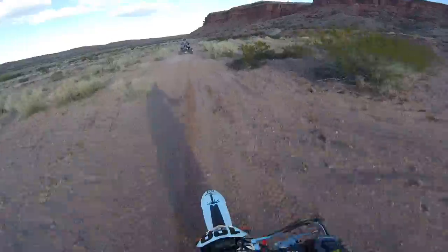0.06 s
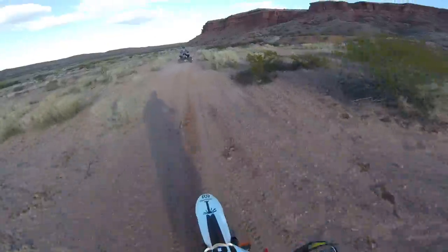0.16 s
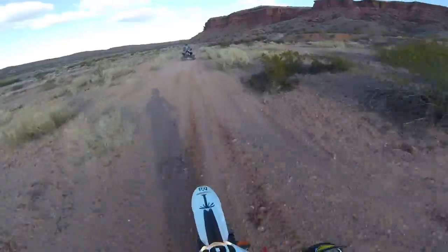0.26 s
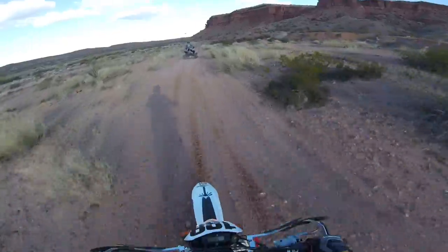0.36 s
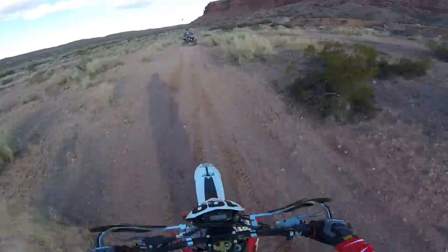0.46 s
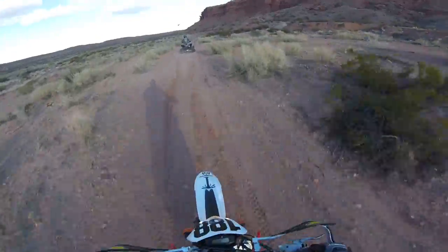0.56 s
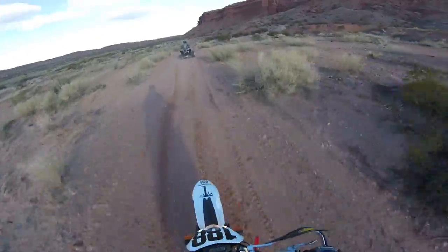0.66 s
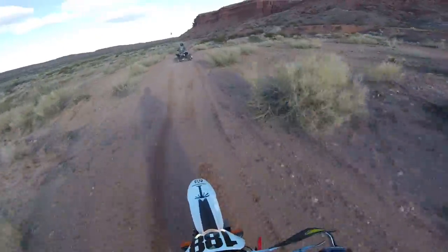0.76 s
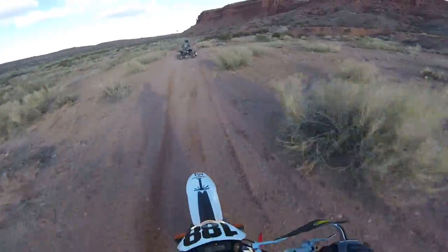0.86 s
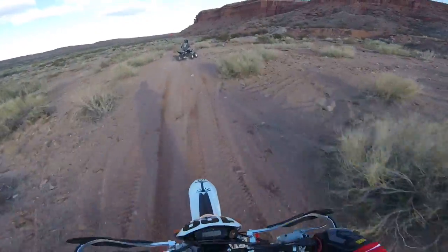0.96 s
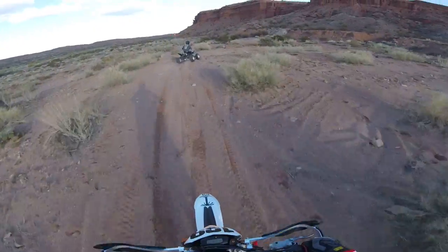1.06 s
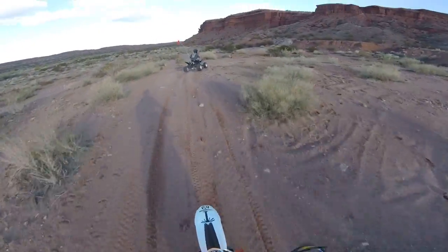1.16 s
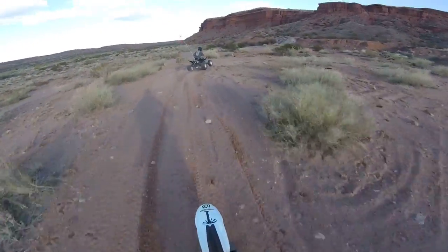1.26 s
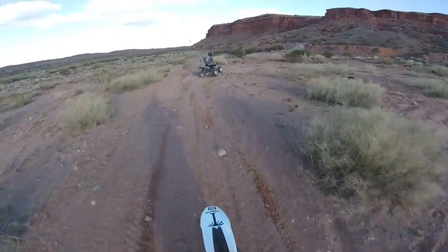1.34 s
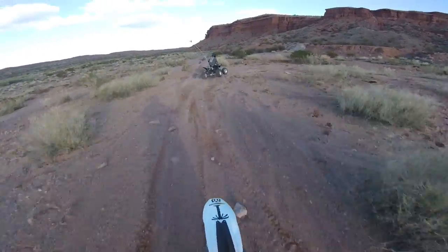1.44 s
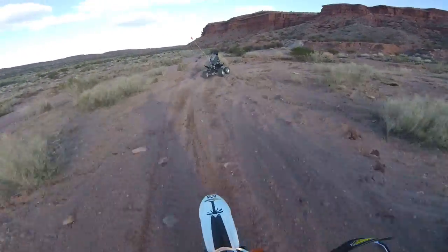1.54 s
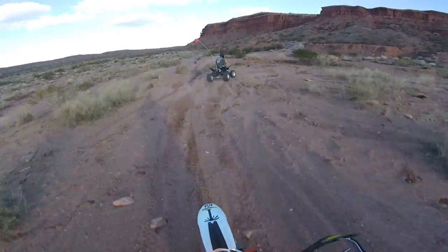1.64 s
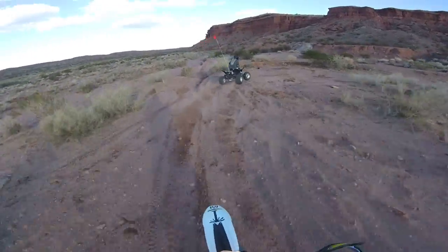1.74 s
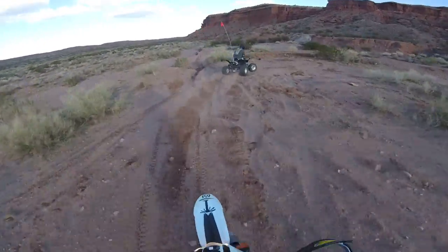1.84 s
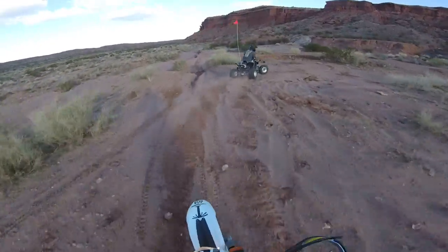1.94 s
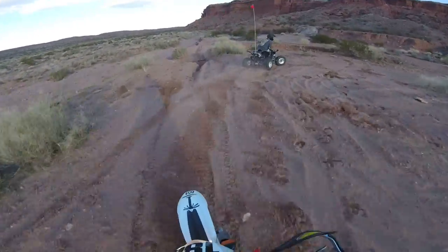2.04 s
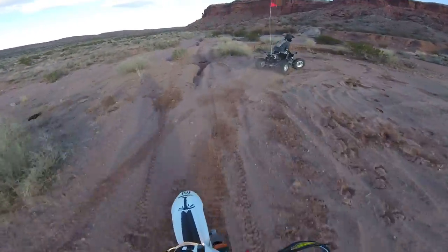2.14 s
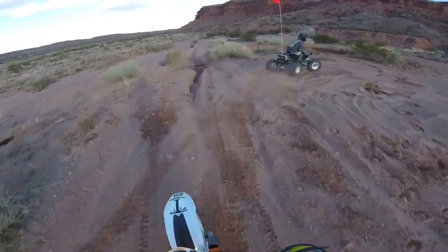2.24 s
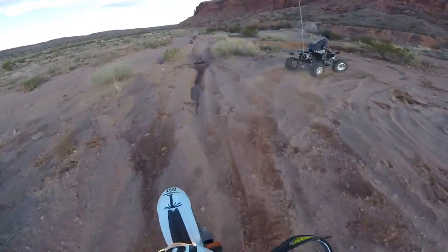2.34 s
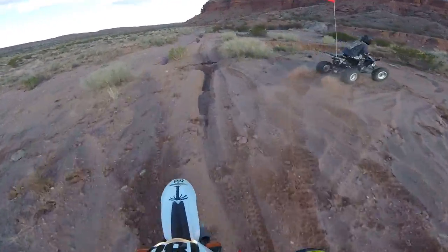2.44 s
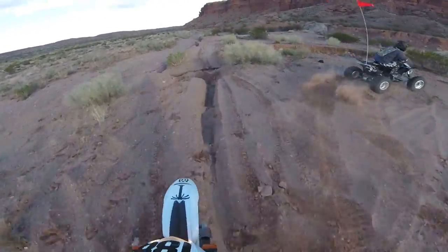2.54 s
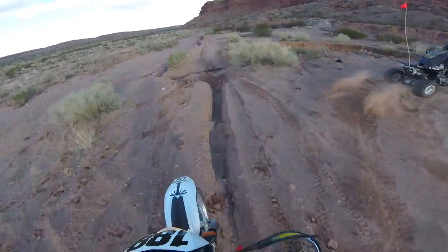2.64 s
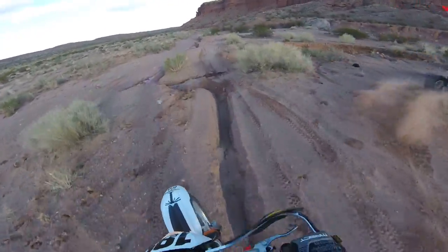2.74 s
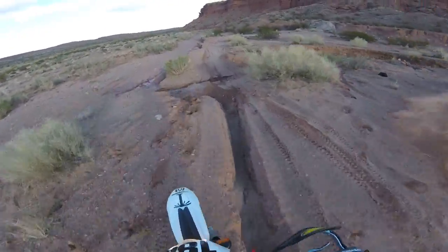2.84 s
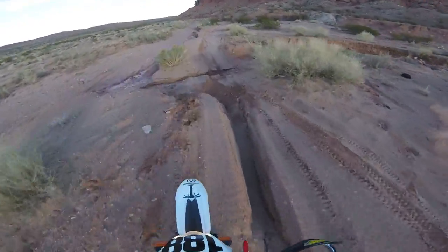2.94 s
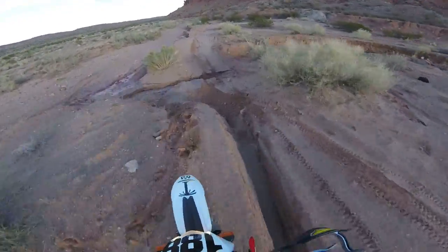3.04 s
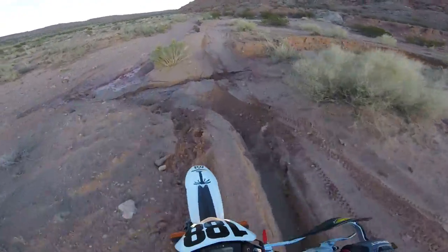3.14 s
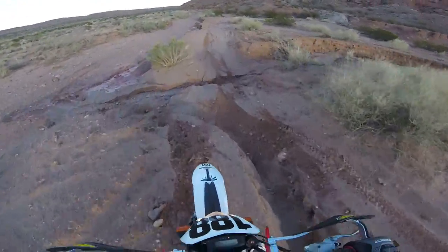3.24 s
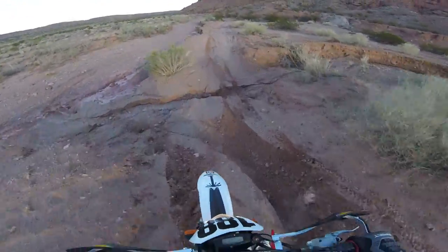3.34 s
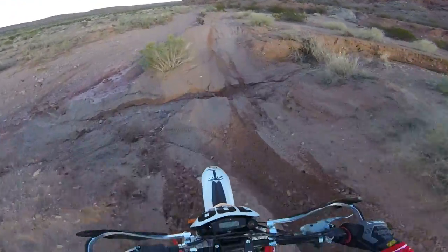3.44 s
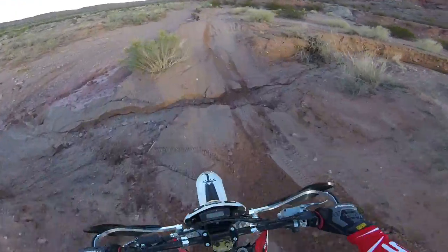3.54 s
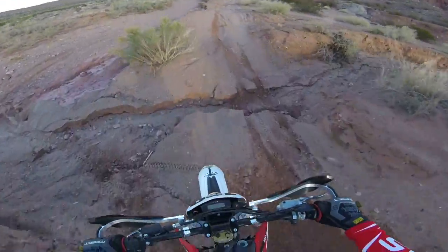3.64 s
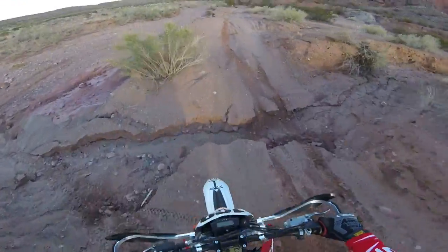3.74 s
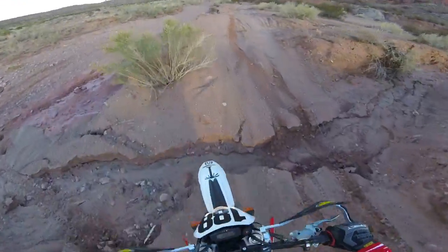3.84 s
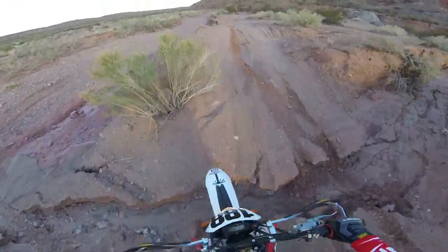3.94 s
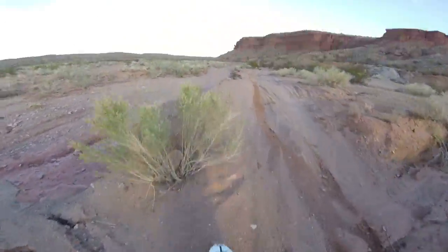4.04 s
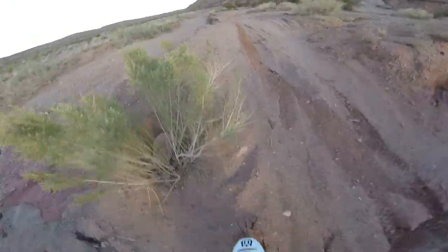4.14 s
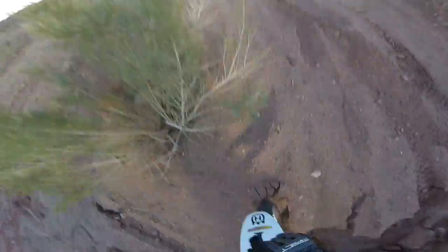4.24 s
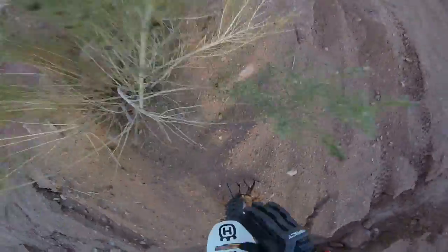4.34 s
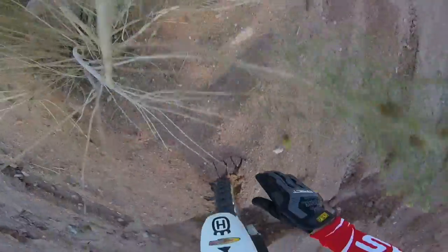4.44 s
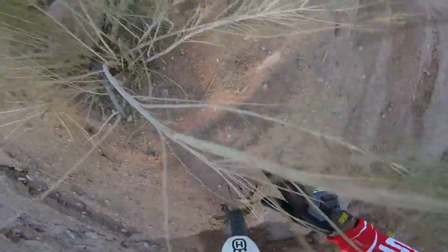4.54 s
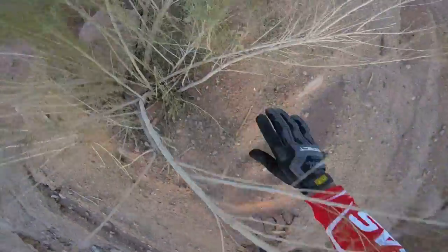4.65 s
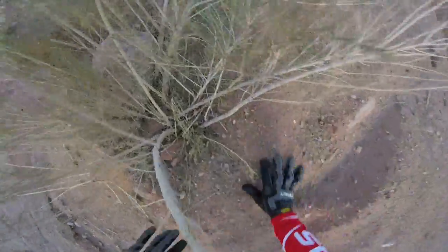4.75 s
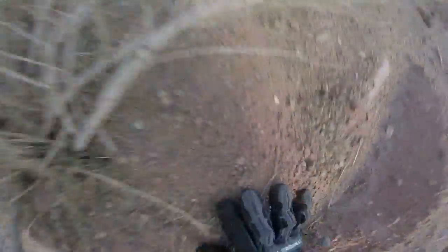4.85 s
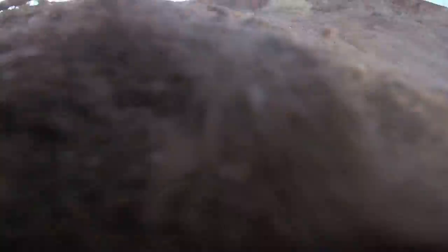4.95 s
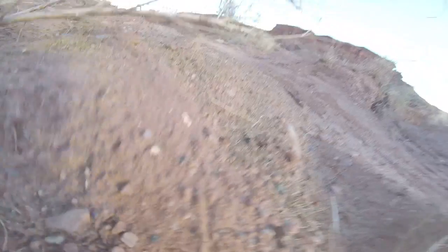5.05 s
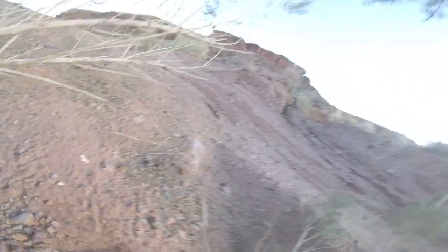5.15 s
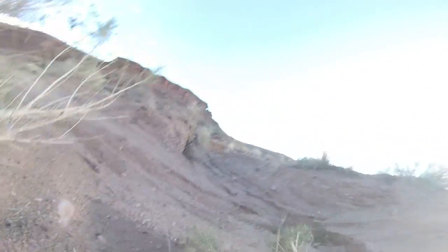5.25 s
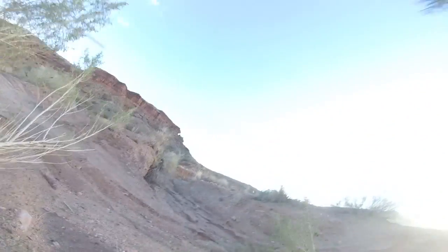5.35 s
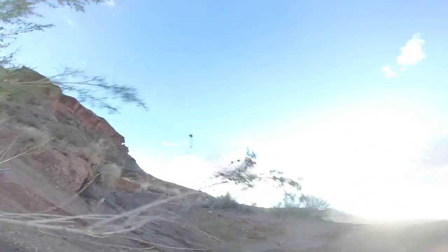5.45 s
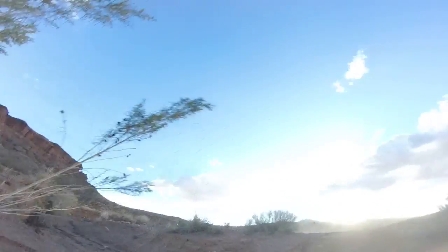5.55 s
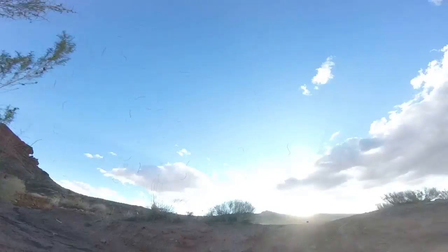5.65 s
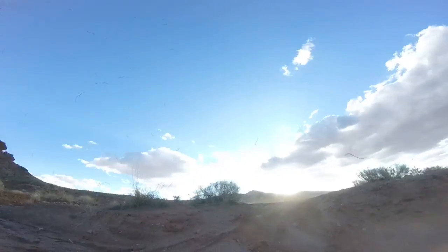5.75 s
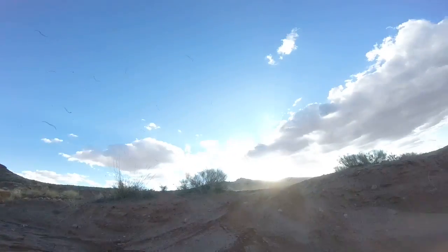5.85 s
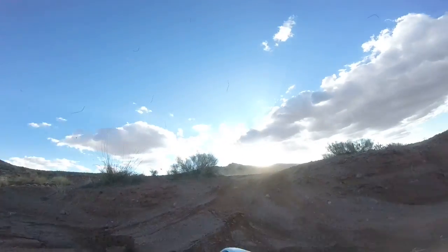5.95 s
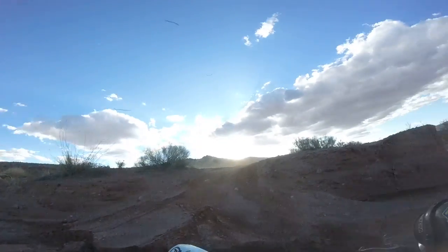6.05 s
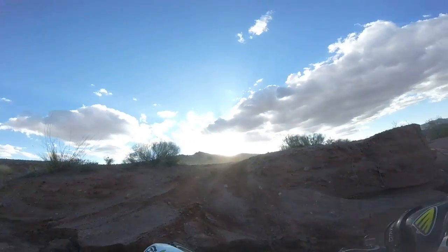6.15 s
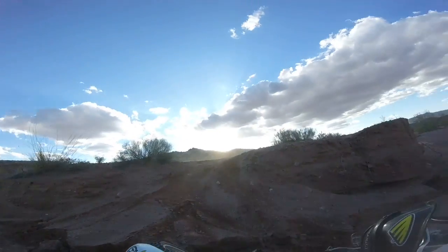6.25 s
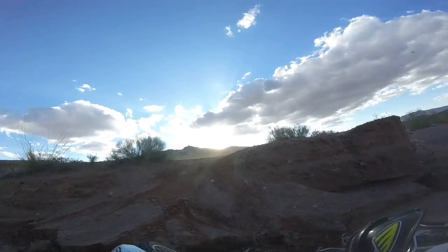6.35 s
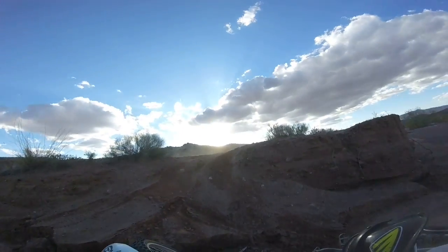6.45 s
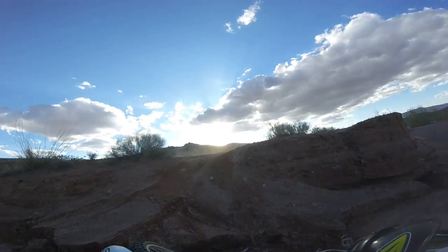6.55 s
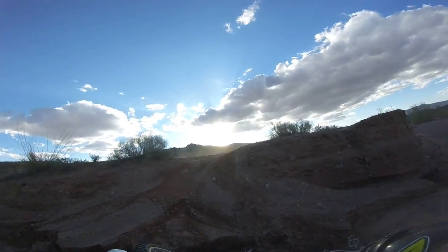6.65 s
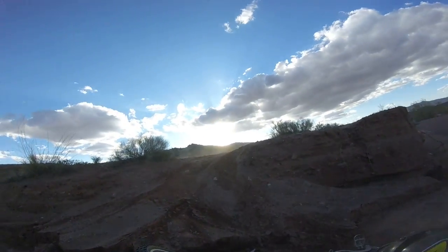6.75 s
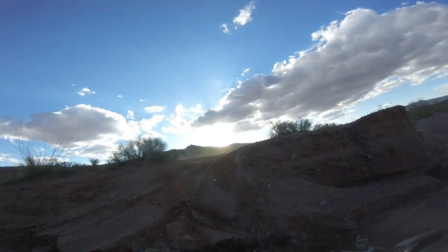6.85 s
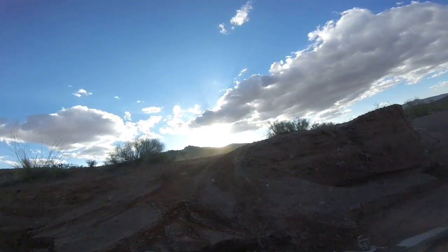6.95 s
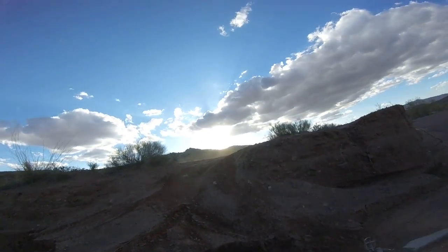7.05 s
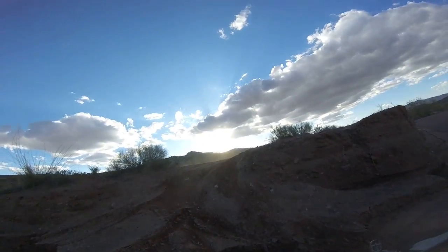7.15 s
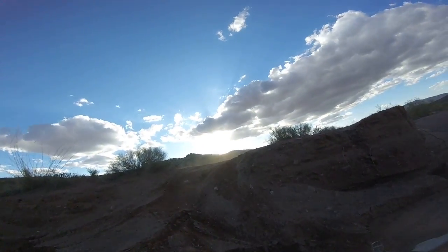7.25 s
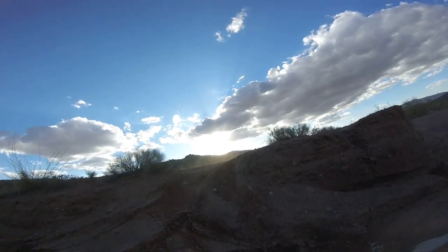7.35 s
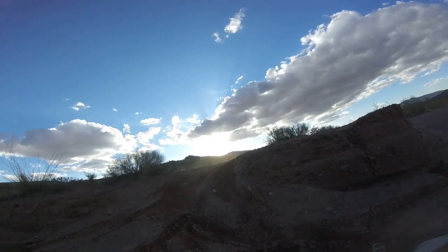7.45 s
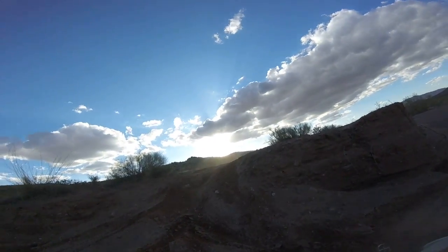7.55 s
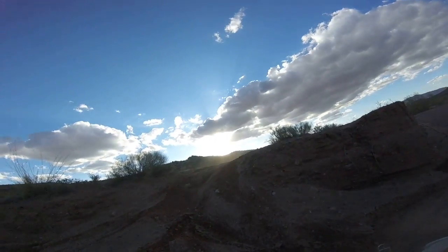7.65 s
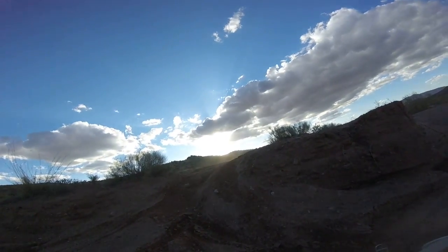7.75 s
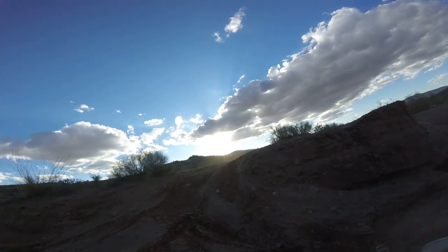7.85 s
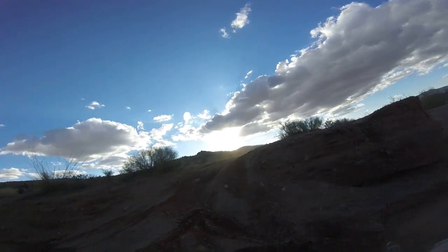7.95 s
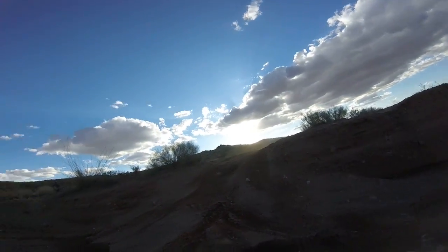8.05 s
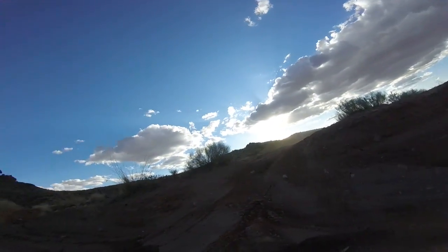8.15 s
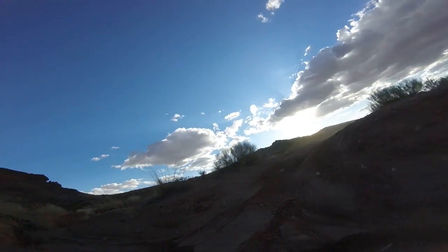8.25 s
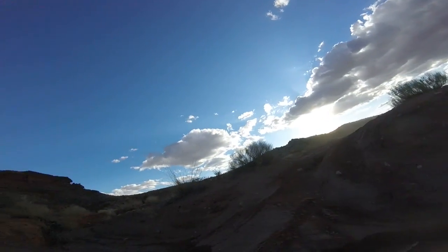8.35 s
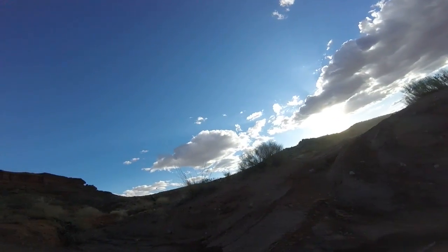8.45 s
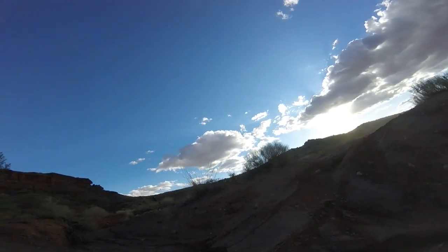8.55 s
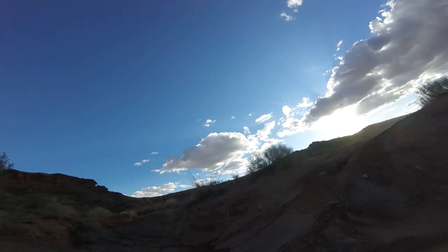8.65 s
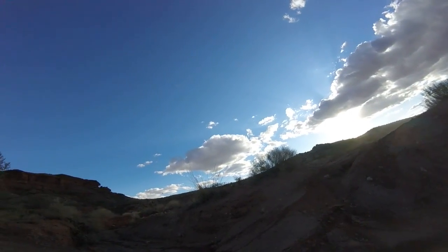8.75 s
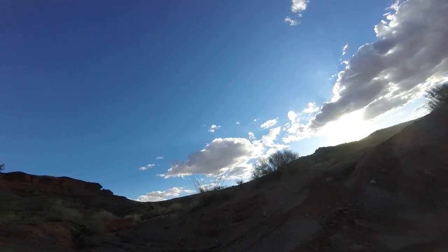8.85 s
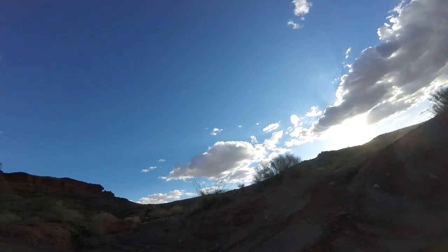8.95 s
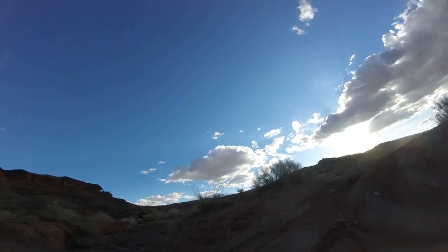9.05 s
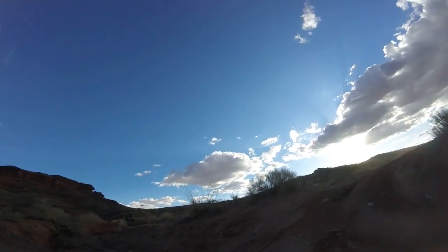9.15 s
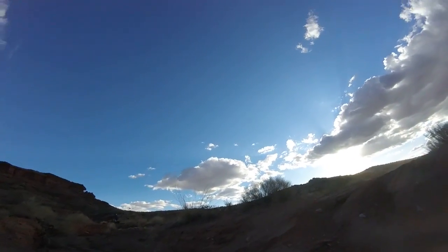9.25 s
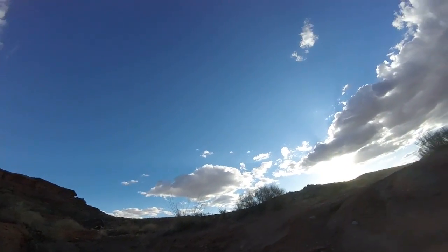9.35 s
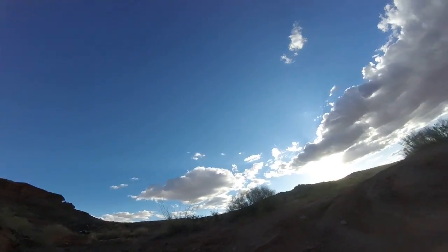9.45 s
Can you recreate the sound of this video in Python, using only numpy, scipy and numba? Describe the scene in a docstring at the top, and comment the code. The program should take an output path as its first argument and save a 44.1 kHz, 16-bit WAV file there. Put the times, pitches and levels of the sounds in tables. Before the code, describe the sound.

Muffled helmet-mounted perspective of a single-cylinder dirt bike riding, revving to a howl, crashing with hard knocks and twig scrapes, then sputtering idle.

```python
"""A single-cylinder four-stroke dirt bike heard through a cased helmet microphone: each firing rings the
exhaust and spits gas. A quad revs ahead and wind buffets the port; then the rider falls through a bush:
twigs scrape, the helmet is knocked, the port is briefly blocked. Afterwards the bike lies a few metres off
and runs unevenly while the rider shifts on the ground. Pulse trains and noise drive band-pass resonances."""
import sys
import numpy as np
from scipy import signal
from scipy.io import wavfile
from scipy.ndimage import uniform_filter1d
from numba import njit

SR = 44100
rng = np.random.default_rng(int(sys.argv[2]) if len(sys.argv) > 2 else 0)


def store_pcm(level_fs):
    """Save levels as 16-bit WAV."""
    pcm = np.round(np.clip(level_fs, -1, 1) * 32767).astype(np.int16)
    wavfile.write(sys.argv[1], SR, np.atleast_2d(pcm).T)


N = 418950
T = np.arange(N) / SR
FAR_FROM_S = 4.95  # from here the bike lies off

# Engine speed: start_s, firings_per_s
FIRING_RATE = [(0, 39), (0.25, 42), (0.42, 37.5), (0.55, 48), (0.75, 41), (1, 30.35), (1.2, 28.57),
               (1.8, 25.65), (2.6, 25.12), (2.8, 21.25), (3.1, 23.23), (3.3, 20.9), (3.45, 27.7),
               (3.55, 42), (3.68, 52.7), (3.79, 60.3), (3.92, 68.7), (4, 65), (4.15, 45.93), (4.3, 25.69),
               (4.6, 26.07), (5.3, 19.52), (5.6, 23.07), (5.9, 15.29), (6.3, 26.07), (7.1, 23.26),
               (7.4, 30.87), (7.5, 25.69), (7.9, 25.91), (8.1, 35.72), (8.2, 19.08), (8.5, 25.41),
               (8.7, 19.38), (9, 28.95), (9.1, 26.53), (9.3, 31.66), (9.5, 28.94)]
# Exhaust: start_s, thump_db, boom_re_thump_db, bark_re_thump_db, ring_re_thump_db, gas_spit_db
EXHAUST_LEVELS = [(0, -32.5, 3, 5, -14, -45), (0.7, -33.5, -3, 7, -16, -56),
                  (1.1, -35.5, 2.5, -12, -30, -55.5), (1.7, -38, 2.5, -4.5, -17, -52.5),
                  (2.2, -35.5, 6, 3.5, -14, -53.5), (2.4, -22.5, -5, -9.5, -17, -43),
                  (2.85, -26, 1, -5, -54, -39.5), (3.4, -27, -3.5, 2.5, -9, -46),
                  (3.55, -33, 5, 10, -26, -48.5), (3.9, -33.5, 3.5, 6, -29, -50),
                  (4.1, -31, -1, -5, -20, -39), (4.25, -35.5, -13, -6, -28, -41.5),
                  (4.75, -35, 5, -12, -18, -72), (5, -59.5, 9, 6, -27, -70), (5.3, -45.5, 3, 7, 0, -57.5),
                  (5.6, -48, 6, -9, -9, -50.5), (5.9, -55, 16, -18, -31, -66),
                  (6.12, -35, -2.5, -19.5, -17.5, -66.5), (6.35, -32, -16, -21, -16.5, -70),
                  (6.6, -35, -4, -26, -20, -80), (7, -45.5, 14.5, -12.5, -17.5, -75.5),
                  (7.35, -32.5, 0, -12, -23.5, -62), (7.8, -30, -7.5, -15, -20.5, -62.5),
                  (8.05, -25.5, -22, -27, -23, -64), (8.18, -34.5, -5, -19, -26, -80),
                  (8.45, -35.5, 3, -2.5, -26, -68), (8.62, -52, 20, -25, -33, -79),
                  (8.9, -28.5, -2, -10.5, -37, -64), (9.0, -27.5, -3.5, -7.5, -38, -54.5),
                  (9.22, -24.5, -4.5, -9.5, -38, -50.5), (9.5, -27.5, -8, -13.5, -37, -67)]
# Spread of the firings, largest when the engine lugs: start_s, share
UNEVENNESS = [(0, .5), (0.8, .5), (1.2, 1), (3.4, 1), (3.6, .15), (4.05, .2), (4.3, 1), (5.7, .8),
              (6.1, .35)]
# The wheel skips and shakes the timing: start_s, spread_cycles
TIMING_WOBBLE = [(0, .025), (0.9, .03), (1.2, .02), (2.2, .008), (9.5, .005)]
# Firings harder or softer than their neighbours while the engine lugs: start_s, level_db
ACCENTS = [(2.334, 8), (2.41, -4), (2.495, 4), (2.693, 3), (2.786, 3), (2.832, 5), (2.92, -6), (2.966, 2.5),
           (3.014, 5), (3.057, -8), (3.098, -9), (3.143, 3), (3.229, -7), (3.278, 1.5), (3.326, 6)]
# Lowest exhaust resonances: start_s, thump_hz, thump_and_boom_width_hz
THUMP_PITCH = [(5.9, 149, 27), (6.15, 140, 17.4), (6.5, 141.7, 11), (7.0, 141, 21.5), (7.2, 146, 25),
               (7.6, 141, 25), (7.8, 150, 14.4), (8.15, 153, 16), (8.5, 146, 31), (8.85, 140.5, 25.5),
               (9.5, 149, 27)]
BOOM_HZ, BARK_HZ, BARK_WIDTH_HZ = 101.7, 260.5, 64  # bark before its lift at high revs
RING_HZ, RING_WIDTH_HZ = 440, 21  # at 25 firings/s
RING_RISE_PER_FIRING = 0.012  # share per firing/s above 25
SWELL_FAR = 2.2  # tone swell is this much quicker far off
LEAD_S, LAG_S, LAG_FAR_S = 0.0022, 0.0042, 0.003  # pipe leads the beat; note, crack and gas lag the pipe

# Gas turbulence, bike near: centre_hz, width_hz, level_db
GAS_NEAR = [(780, 124, 8.5), (1170, 920, 9.5), (2240, 3000, 10), (3120, 2600, 3.5), (5300, 5400, -23)]
# Gas turbulence, bike far: centre_hz, width_hz, level_db
GAS_FAR = [(1120, 300, -1), (1340, 320, 0), (2230, 2500, -2.5), (4500, 5300, -7.5)]
# Spit decay, smeared at speed and at distance: start_s, decay_s
SPIT_DECAY = [(0.8, 0.008), (2.2, 0.0051), (4.9, 0.0055), (5.0, 0.013)]
SPIT_RISE_S, SPIT_SCATTER_DB = 0.0011, 1.5
RASP_HZ, RASP_WIDTH_HZ = 516, 450
RASP_DB, RASP_FAR_DB = 5.5, -3.5  # re gas spit; added far off
# Front edge of each near firing, strongest when the engine lugs: start_s, level_re_gas_db
CRACK_LEVEL = [(0, -28), (2.2, -25), (2.35, -5.5), (3.4, -3.5), (3.55, -11), (4.1, -5), (4.3, -15)]
CRACK_HZ, CRACK_WIDTH_HZ, CRACK_SCATTER_DB = 1400, 760, 2.0
# Open tailpipe note: start_s, level_db
NOTE_LEVEL = [(0, -29), (0.75, -33), (1.1, -55), (2.2, -45.5), (2.45, -48), (2.85, -41.5), (3.4, -41.5),
              (3.6, -32), (3.9, -31), (4.05, -36), (4.25, -40.5), (5, -60), (5.6, -45), (6, -68),
              (6.2, -51.5), (6.5, -58.5), (6.9, -66), (7.3, -50.5), (7.8, -51.5), (8.1, -52), (8.7, -71),
              (9.2, -49), (9.5, -57)]
NOTE_HZ, NOTE_WIDTH_HZ = 585, 485
UPPER_HZ, UPPER_WIDTH_HZ, UPPER_DB = 540, 1800, -1  # level re note at 60 firings/s
# Clean tones of the free-revving engine: multiple_of_firing_rate, level_db
HOWL_TONES = [(1, -6.5), (2, 0), (3, -2.5), (4, 4.5), (5, -3.5), (6, -0.5), (7, -15), (8, -1.5), (9, -9),
              (10, -15), (11, -17.5), (12, -11.5), (13, -13), (14, -17.5), (16, -20.5), (17, -16)]
# Howl: start_s, level_db
HOWL_LEVEL = [(3.47, -60), (3.57, -36), (3.75, -26), (3.92, -24.5), (4.0, -27), (4.12, -40), (4.25, -60)]
# Howl rasp, throbbing once a cycle: centre_hz, width_hz, level_db
HOWL_RASP = [(1900, 620, 0), (3800, 600, -6)]
HOWL_RASP_DB = -13.5  # mean, re howl tones

# Quad opening its throttle in the bend: start_s, firings_per_s
QUAD_RATE = [(1.9, 22), (2.1, 30), (2.2, 36.5), (2.5, 40)]
# Quad: start_s, level_db
QUAD_LEVEL = [(1.8, -70), (2, -34), (2.1, -31), (2.3, -31.5), (2.5, -35), (2.9, -71)]
# Quad exhaust: centre_hz, width_hz, level_db
QUAD_PIPE = [(327, 61, 1), (617, 85, -8)]
QUAD_BEAT_S = 2.109  # time of one firing

# Blows on the helmet: start_s, body_peak_db, body_hz, treble_re_body_db
KNOCKS = [(1.013, -18.5, 386, -12), (1.4, -18.5, 553, -46), (1.449, -24.5, 581, -38),
          (1.933, -33, 400, -24), (4.105, -8.5, 684, -3), (4.163, -14, 800, 5.5), (4.191, -17, 490, 2),
          (4.259, -21.5, 790, -27), (4.315, -11.5, 785, -41), (4.415, -31, 620, -22),
          (4.481, -37.5, 466, 13.5), (4.501, -23.5, 846, 4), (4.518, -30.5, 450, 11.5),
          (4.54, -34.5, 415, 13), (4.564, -31, 1170, -14), (4.58, -23, 423, -14), (4.619, -33, 1150, -25),
          (4.634, -22, 1080, -30), (4.698, -33, 401, -10), (4.716, -24, 403, -25), (4.757, -24.5, 784, 0.5),
          (4.782, -16, 676, -13), (4.817, -21.5, 1640, -14), (4.82, -18, 900, -25), (4.828, -13, 815, -25),
          (4.845, -8, 745, -26), (4.851, -16, 650, -28), (4.863, -18, 470, -30), (4.873, -19, 400, -30),
          (4.931, -17.5, 410, -27), (5.028, -33.5, 630, -28), (5.153, -45, 405, -8), (5.242, -27, 465, -26),
          (5.281, -21.5, 556, -11.5), (5.357, -16.5, 595, -29), (5.363, -18, 483, -25),
          (5.372, -18.5, 850, -31), (5.377, -16, 650, -25), (5.424, -26, 643, -17), (5.456, -22, 800, -23),
          (5.467, -24, 790, -10), (5.483, -25, 583, -1), (5.544, -29.5, 760, -15), (5.582, -31, 485, -17),
          (5.63, -38, 464, -22), (5.668, -35, 473, -8), (5.705, -33.5, 458, -29), (5.746, -37, 428, -15),
          (5.762, -27.5, 477, -32), (5.795, -35, 463, 3), (5.872, -36, 920, -12), (5.959, -37, 895, -26),
          (7.143, -46, 744, -18), (8.178, -53, 494, -31), (8.196, -38, 397, -25), (8.208, -30, 425, -19),
          (8.232, -45, 500, -35), (8.266, -35, 402, -32), (8.326, -28, 540, -21), (8.339, -28, 452, -20),
          (8.376, -39, 590, -28), (8.386, -31.5, 396, -35), (8.403, -39, 400, -33), (8.42, -39, 443, -25),
          (8.566, -42, 400, -40), (9.238, -22.5, 605, -10), (9.26, -22.5, 576, -13)]
# Helmet shell modes: tone_hz, relative_db, t60_s
SHELL_MODES = [(285, 5, 0.22), (465, 1.5, 0.045), (734, 6, 0.058), (960, -25, 0.019), (1950, -39, 0.57)]
RATTLE_T60_S, RATTLE_RISE_S = 0.023, 0.00044
SNAP_HZ, SNAP_DB = 1510, -6.5  # level re treble
THUD_DB, SHELL_DB = -12, -10  # re body peak

# Twigs and grit dragged over the case: peak_s, length_s, dull_db, bright_re_dull_db
SCRAPES = [(4.26, 0.18, -39.5, -9), (4.505, 0.15, -50, 7.5), (4.623, 0.23, -49, -4.5),
           (4.758, 0.12, -46, 3.5), (4.861, 0.18, -34.5, -20), (4.933, 0.028, -52, -12),
           (5.029, 0.017, -55.5, 4), (5.261, 0.18, -44.5, -15), (5.375, 0.023, -49, -1),
           (5.468, 0.08, -39.5, -1), (5.559, 0.1, -42, -14), (5.704, 0.036, -49, -3),
           (5.767, 0.055, -47.5, -2.5), (5.966, 0.048, -52, -4)]
SCRAPE_RISE = 0.75  # rise time re fall time
# Grit snapping on the case: start_s, level_db
GRIT_SNAPS = [(0.2696, -6.5), (1.077, -2), (4.892, -1.5), (4.924, 2), (6.255, -36), (6.283, -34),
              (6.399, -31.5), (6.798, -33.5), (6.971, -39), (7.063, -29.5), (7.315, -35), (7.3786, -32),
              (7.487, -34), (7.6036, -39), (7.692, -31), (7.781, -30)]
GRIT_T60_S = 0.017
# Air trapped and let go at the port: start_s, peak_db, decay_s
PORT_POPS = [(4.892, -21, 0.011), (4.9274, -5, 0.0021)]
BLOCKED_FROM_S, BLOCKED_TO_S, BLOCKED_DB = 4.8935, 4.9255, -24  # port pressed shut

# Air: start_s, low_wind_between_gusts_db, roar_db, engine_and_chain_clatter_db, high_hiss_db
AIR_LEVELS = [(0.04, -29.5, -29.5, -49, -49.5), (0.2, -24, -31, -45, -56.5),
              (0.6, -27.5, -29.5, -42.5, -51), (1.1, -35, -36, -54, -61.5),
              (1.75, -31.5, -32.5, -49.5, -61.5), (2.33, -39, -36, -48.5, -56),
              (2.8, -30.5, -34, -45.5, -54), (3.3, -27.5, -45.5, -49, -58.5),
              (3.57, -45, -31, -40.5, -50.5), (3.8, -34, -31, -33.5, -43.5), (3.92, -30, -26, -34, -43),
              (4.1, -30, -32.5, -38.5, -47), (4.3, -28.5, -38.5, -48.5, -55), (4.85, -41, -34, -56, -57.5),
              (5, -41.5, -50.5, -67, -76), (5.9, -45.5, -58, -65, -70.5), (6.36, -43, -56, -78, -70),
              (6.9, -43.5, -60, -85, -70), (7.47, -42.5, -49, -73, -68), (8, -32, -51, -81, -66),
              (8.15, -35.5, -56, -80, -66), (8.3, -35, -46, -78, -66.5), (8.5, -38.5, -50.5, -72, -65),
              (8.8, -42, -58, -74, -66), (9.16, -45, -40, -59.5, -59), (9.5, -35, -43, -59, -64.5)]
# Gusts and bumps on the port: peak_s, peak_db, length_s
GUSTS = [(0.005, -6.5, 0.029), (0.11, -21.5, 0.09), (0.384, -26, 0.025), (0.477, -15.5, 0.085),
         (0.608, -19, 0.088), (0.706, -20.5, 0.13), (0.955, -19, 0.22), (1.43, -17, 0.086),
         (1.57, -25.5, 0.044), (1.742, -36, 0.15), (1.915, -18, 0.19), (2.09, -23.5, 0.23),
         (2.323, -16.5, 0.045), (2.506, -24, 0.088), (2.783, -20.5, 0.088), (3.027, -24, 0.1),
         (3.138, -25, 0.034), (3.567, -26.5, 0.14), (3.754, -25.5, 0.15), (3.899, -18, 0.074),
         (4.081, -19, 0.12), (4.189, -24, 0.094), (4.364, -31, 0.091), (4.507, -44, 0.067),
         (4.867, -23.5, 0.085), (5.07, -67, 0.091), (5.29, -31, 0.063), (5.402, -25, 0.046),
         (8.204, -27, 0.059), (8.287, -32, 0.031), (8.43, -30, 0.12), (8.603, -50, 0.57),
         (9.08, -43, 0.093), (9.25, -40, 0.082)]
# Wind rumble, then roar: centre_hz, width_hz, level_db
RUMBLE = [(38.3, 40.6, 3.5), (69.6, 65, 3.0), (136.0, 143, -3.5), (212.8, 66, -6.0)]
ROAR = [(286.0, 221, 9.0), (620, 470, -2.5), (880, 1030, -8.0), (1290, 960, -18.0)]
# Clatter resonances: centre_hz, width_hz, level_db
CLATTER = [(1030, 460, -3.5), (1817, 1170, 0.5), (3680, 2040, -5), (2600, 3800, 1), (5800, 5800, -11.5)]
# High hiss: centre_hz, width_hz, level_db
HISS = [(1230, 480, 5.5), (2970, 1900, 0), (6720, 3200, 6), (6510, 190, 2), (8300, 3750, 2),
        (11770, 5600, -24)]
CAVITY_HZ, CAVITY_WIDTH_HZ, CAVITY_DB = 6530, 300, 4  # port cavity; level of the added band
CASE_HZ, TOP_HZ = 7080, 14200  # low-pass corners


def undb(db):
    """Decibels to amplitude."""
    return 10 ** (np.asarray(db) / 20)


def unit(x):
    """Scale to RMS 1."""
    return x / np.sqrt(np.mean(x ** 2))


def curves(table):
    """Interpolate each column over the scene against the first, in seconds."""
    s, *columns = np.transpose(table)
    return [np.interp(T, s, c) for c in columns]


@njit
def svf(x, hz, width_hz):
    """State-variable band-pass with a moving centre and width, gain 1 at the centre."""
    y, b, l = np.empty(len(x)), 0., 0.
    for i in range(len(x)):
        g, k = np.tan(np.pi * hz[i] / SR), width_hz[i] / hz[i]
        v = (b + g * (x[i] - l)) / (1 + g * (g + k))
        b, l, y[i] = 2 * v - b, l + 2 * g * v, k * v
    return y


def band(x, hz, width_hz):
    """The same band-pass; a still centre and width need no loop."""
    x = x + 1e-18
    if np.ndim(hz) + np.ndim(width_hz):
        return svf(x, hz + np.zeros(len(x)), width_hz + np.zeros(len(x)))
    g = np.tan(np.pi * hz / SR)
    kg = g * width_hz / hz
    return signal.lfilter([kg, 0, -kg], [1 + kg + g * g, 2 * (g * g - 1), 1 - kg + g * g], x)


def steep(x, hz, width_hz, widening=1):
    """Two band-passes in series, the second wider by a factor."""
    return band(band(x, hz, width_hz), hz, widening * width_hz)


def walk(rate_hz):
    """Random levels held 1 / rate_hz and slewed twice; RMS 1."""
    k = int(SR / rate_hz)
    held = np.repeat(rng.standard_normal(N // k + 1), k)
    return unit(uniform_filter1d(uniform_filter1d(held, k), k)[:N])


def steady(x, span_s=0.49):
    """Even out the slow level so that a curve can set it."""
    return x / np.sqrt(uniform_filter1d(x ** 2, int(span_s * SR)) + 1e-12)


def colours(modes, flicker_db, rate_hz):
    """Unrelated noise in each steep resonance, each flickering alone; RMS 1."""
    total = 0
    for hz, width_hz, db in modes:
        level = undb(db + flicker_db * walk(rate_hz))
        total = total + level * unit(steep(rng.standard_normal(N), hz, width_hz))
    return unit(total)


def bike():
    """Firing pulses and weaker late pulses ring the exhaust; gas spits after each firing."""
    [rate] = curves(FIRING_RATE)
    thump_db, boom_db, bark_db, ring_db, gas_db = curves(EXHAUST_LEVELS)
    [scatter], [wobble] = curves(UNEVENNESS), curves(TIMING_WOBBLE)
    near = T < FAR_FROM_S
    lead = LEAD_S * rate * np.clip(FAR_FROM_S + 1 - T, 0, 1)
    turns = 1 + np.cumsum(rate) / SR + lead + wobble * walk(25)  # one per firing
    cycle = turns.astype(int)
    phase = turns - cycle
    since_s = phase / rate
    chance = rng.standard_normal((1000, 4))[cycle].T * scatter
    accent_db = np.zeros(1000)
    for s, db in ACCENTS:
        accent_db[cycle[int((s + .01) * SR)]] = db
    accent_db = accent_db[cycle]

    late_pulse = np.diff(phase > .62 + .02 * chance[3], prepend=False) & (phase > .3)
    pulses = np.diff(cycle, prepend=1) * undb(1.6 * chance[0])
    pulses = pulses + late_pulse * undb(-17.0 + 3.2 * chance[1] + np.where(near, 0, -6))
    # turbulence after the valve opens colours every firing
    pulses = pulses + .045 * scatter * np.exp(-since_s / .004) * rng.standard_normal(N)

    body = exhaust_body(pulses, rate, chance[1], (0, boom_db, bark_db, ring_db))
    rasp_db = gas_db + RASP_DB + RASP_FAR_DB * (T > FAR_FROM_S)
    rasp = undb(rasp_db) * steady(steep(pulses, RASP_HZ, RASP_WIDTH_HZ, 3))
    hits = pulses * undb(CRACK_SCATTER_DB * chance[2] + accent_db)
    crack_db = gas_db + curves(CRACK_LEVEL)[0]
    crack = undb(crack_db) * steady(band(hits, CRACK_HZ, CRACK_WIDTH_HZ)) * near
    gas = undb(gas_db) * gas_spit(since_s, SPIT_SCATTER_DB * chance[2] + accent_db)
    late_parts = delay(gas - tailpipe_note(pulses, rate) - crack - rasp)
    return undb(thump_db) * body + howl(turns) + late_parts


def exhaust_body(pulses, rate, detune, levels_db):
    """Pipe and silencer in series: each tone swells, then rings out."""
    thump_hz, low_width_hz = curves(THUMP_PITCH)
    quick = np.where(T < FAR_FROM_S, 1, SWELL_FAR)
    # hotter gas at high revs lifts the bark
    bark_hz = BARK_HZ * (1 + .52 * np.clip((rate - 43) / 25, 0, 1))
    ring_hz = RING_HZ * (1 + RING_RISE_PER_FIRING * (rate - 25))
    modes = ((thump_hz, low_width_hz), (BOOM_HZ, low_width_hz),
             (bark_hz, BARK_WIDTH_HZ), (ring_hz, RING_WIDTH_HZ))
    body = 0
    # opposite senses let neighbouring resonances fill the gap between them
    for (hz, width_hz), db, sense in zip(modes, levels_db, (-1, 1, 1, -1)):
        moving_hz = hz * (1 + 0.097 * detune * (1 + (hz > 300)))
        tone = band(pulses, moving_hz, width_hz)
        tone = band(tone, hz, 2.97 * quick * width_hz)
        tone = band(tone, hz, 5.4 * quick * width_hz)
        body = body + sense * undb(db) * steady(tone)
    return body


def gas_spit(since_s, firing_db):
    """Turbulent gas bursts after each firing and decays to a faint floor."""
    [decay_s] = curves(SPIT_DECAY)
    spit = undb(firing_db) * np.exp(-since_s / decay_s)
    spit = spit * (1 - np.exp(-(since_s / SPIT_RISE_S) ** 2)) + 0.021
    gas = np.where(T < FAR_FROM_S, colours(GAS_NEAR, 2.5, 30), colours(GAS_FAR, 2.5, 30))
    return steady(spit * gas)


def tailpipe_note(pulses, rate):
    """The tailpipe rounds each pulse and resonates; the upper part grows with revs."""
    pulses = np.convolve(pulses, np.hanning(70) / 35)[:N]
    upper = steady(steep(pulses, UPPER_HZ, UPPER_WIDTH_HZ)) * undb(UPPER_DB) * (rate / 60) ** 2
    note = steady(steep(pulses, NOTE_HZ, NOTE_WIDTH_HZ))
    return undb(curves(NOTE_LEVEL)[0]) * (note - upper)


def howl(turns):
    """Free revving: harmonics of the firing rate plus noise throbbing once a cycle."""
    angle = 2 * np.pi * turns
    tones = unit(sum(undb(db) * np.sin(k * (angle + k)) for k, db in HOWL_TONES))
    throb = 1 + 0.53 * np.cos(angle)
    sound = tones + undb(HOWL_RASP_DB) * throb * colours(HOWL_RASP, 2.5, 15)
    return sound * undb(curves(HOWL_LEVEL)[0] + 0.56 * walk(30))


def delay(x):
    """Hold sound back to the first trough of the pipe's swell."""
    lag_s = np.where(T < FAR_FROM_S, LAG_S, LAG_FAR_S)
    return x[np.maximum(np.arange(N) - (lag_s * SR).astype(int), 0)]


def quad():
    """Dull far firings ring a short pipe."""
    turns = np.cumsum(curves(QUAD_RATE)[0]) / SR
    cycle = np.floor(turns - turns[int(QUAD_BEAT_S * SR)]).astype(int)
    pulses = np.diff(cycle, prepend=cycle[0]) * undb(1.1 * rng.standard_normal(1000))[cycle]
    pipe = sum(undb(db) * unit(steep(pulses, hz, width_hz, 2)) for hz, width_hz, db in QUAD_PIPE)
    return undb(curves(QUAD_LEVEL)[0]) * steady(pipe)


def knocks():
    """Each blow is a short rattle: coloured body, treble crack, snap, and the shell thudding and ringing."""
    out, t = np.zeros(N + SR), T[:SR // 5]
    for s, peak_db, hz, treble_db in KNOCKS:
        chance = rng.standard_normal(len(t) + len(SHELL_MODES))
        rattle = chance[:len(t)] * np.exp(-np.log(1000) * t / RATTLE_T60_S)
        rattle = rattle * (1 - np.exp(-t / RATTLE_RISE_S))
        rattle[:30] -= 0.5 * np.hanning(30)  # first contact
        ring = 0
        for (mode_hz, db, t60_s), c in zip(SHELL_MODES, chance[len(t):]):
            decay = np.exp(-np.log(1000) * t / t60_s)
            ring = ring + undb(db + 4 * c) * np.sin(2 * np.pi * mode_hz * t) * decay
        thud = np.sin(2 * np.pi * 110 * t) * np.exp(-t / 0.0069)
        body = steep(rattle, hz, .5 * hz, 2)
        treble = band(rattle, 3000, 5000)
        snap = band(band(rattle, SNAP_HZ, 900), SNAP_HZ, 1300)
        parts = ((body, 0), (treble, treble_db), (snap, treble_db + SNAP_DB),
                 (thud, THUD_DB), (ring, SHELL_DB))
        blow = sum(undb(db) * p / np.abs(p).max() for p, db in parts)
        out[int(s * SR):][:len(t)] += undb(peak_db) * blow
    return out[:N]


def scrape():
    """Dense uneven ticks over a noise bed, heard through the case in dull and bright bands."""
    chance = rng.random((3, N))
    sizes = undb(-4 * np.log(chance[2] + 0.017))
    ticks = (chance[0] < 1500 / SR) * np.sign(chance[1] - .5) * sizes  # 1500 per second
    ticks = ticks + 0.19 * rng.standard_normal(N)
    dull = steady(band(ticks, 1000 * 2 ** (0.41 * walk(10)), 250), 0.12)
    bright = steady(band(ticks, 1860, 1400), 0.058)
    out = 0
    for s, length_s, db, bright_db in SCRAPES:
        stretch = np.where(T < s, SCRAPE_RISE, 1)
        shape = np.exp(-(2 * (T - s) / length_s / stretch) ** 2)
        out = out + undb(db) * shape * (dull + undb(bright_db) * bright)
    return out * undb(3.27 * walk(60))


def grit():
    """A sharp wide click with a few milliseconds of rattle."""
    out, t = np.zeros(N + SR), T[:SR // 20]
    for s, level_db in GRIT_SNAPS:
        snap = 0.15 * rng.standard_normal(len(t)) * np.exp(-np.log(1000) * t / GRIT_T60_S)
        snap[0] = 1.75
        out[int(s * SR):][:len(t)] += undb(level_db) * band(snap, 1400, 6300)
    return out[:N]


def pops():
    """A pressure step that leaks away and swings back once."""
    out = np.zeros(N)
    for s, peak_db, decay_s in PORT_POPS:
        t = np.maximum(T - s, 0)
        slow = t / (4 * decay_s)
        out += undb(peak_db) * (T >= s) * (np.exp(-t / decay_s) - 0.076 * slow * np.exp(1 - slow))
    return out


def wind():
    """Eddies thump the port in gusts, under a roar and the engine and chain clatter."""
    lull_db, roar_db, clatter_db, _ = curves(AIR_LEVELS)
    buffet = undb(lull_db)
    for s, db, length_s in GUSTS:
        buffet = buffet + undb(db) * np.exp(-(2 * (T - s) / length_s) ** 2)
    gust = walk(14)
    low = buffet * undb(0.8 * gust) * steady(colours(RUMBLE, 0.87, 5.5), 0.2)
    roar = undb(roar_db + 0.53 * gust) * colours(ROAR, 1.86, 25)
    return low + roar + undb(clatter_db) * colours(CLATTER, 1.6, 13)


def scene():
    """Sum the sources through the port, which shuts briefly; pops bypass the shutting."""
    shut = (T > BLOCKED_FROM_S) & (T < BLOCKED_TO_S)
    port = uniform_filter1d(np.where(shut, undb(BLOCKED_DB), 1.), size=30)
    outside = bike() + quad() + knocks() + scrape() + grit() + wind()
    return (outside * port + pops())[None]


def record(dry):
    """The port cavity's peak, a case that dulls the treble, a faint high hiss, and the top cut."""
    x = dry[0] + undb(CAVITY_DB) * band(dry[0], CAVITY_HZ, CAVITY_WIDTH_HZ)
    x = signal.sosfilt(signal.butter(4, CASE_HZ, fs=SR, output="sos"), x)
    x = x + undb(curves(AIR_LEVELS)[3]) * colours(HISS, 2.54, 30)
    return signal.sosfilt(signal.ellip(8, .2, 70, TOP_HZ, fs=SR, output="sos"), x)[None]


dry = scene()
out = record(dry)
store_pcm(out)
```